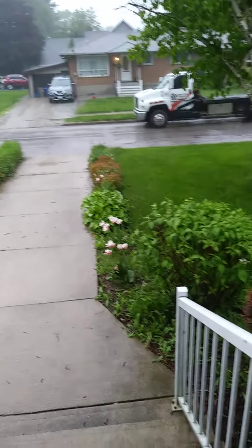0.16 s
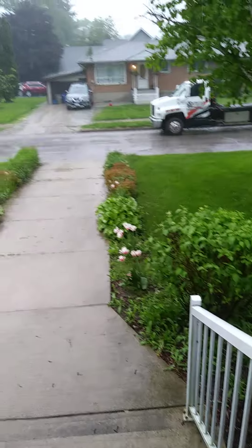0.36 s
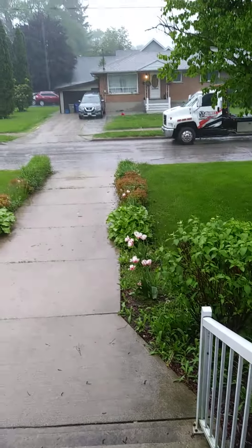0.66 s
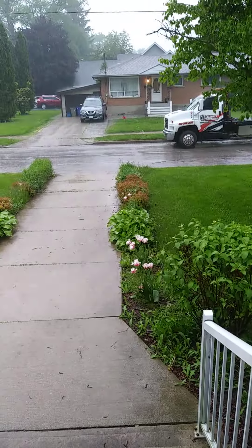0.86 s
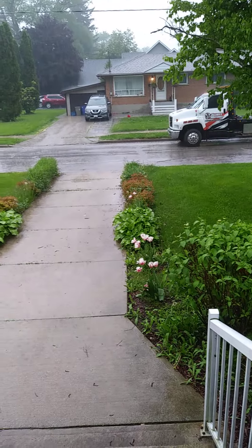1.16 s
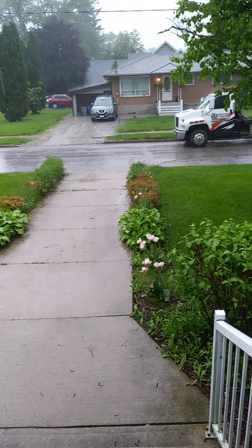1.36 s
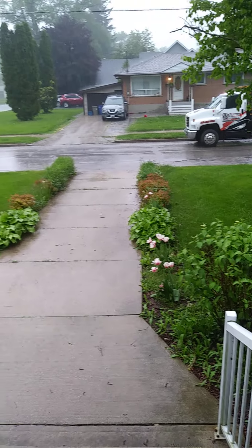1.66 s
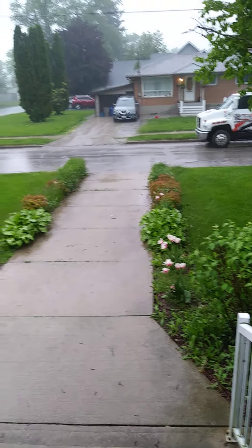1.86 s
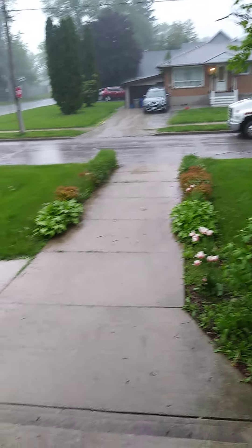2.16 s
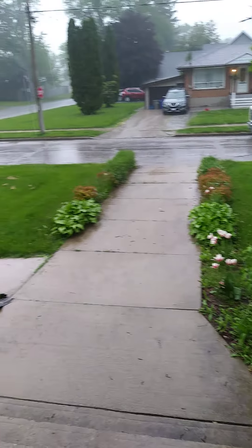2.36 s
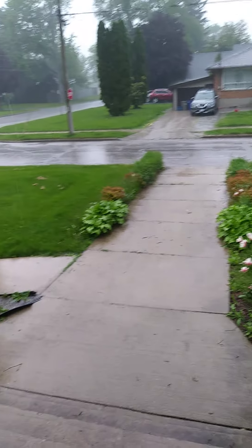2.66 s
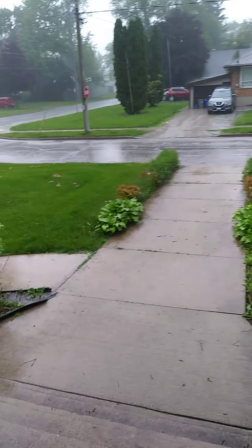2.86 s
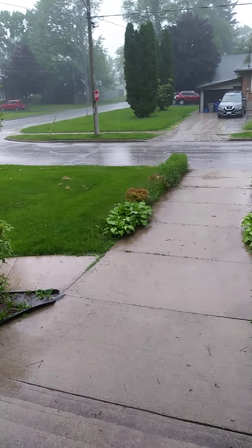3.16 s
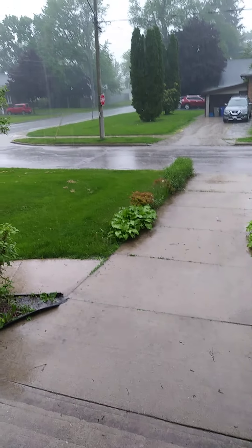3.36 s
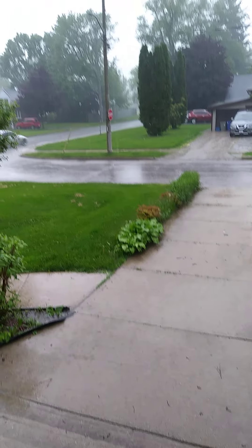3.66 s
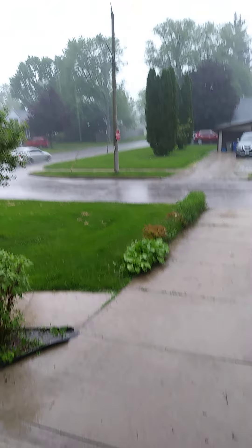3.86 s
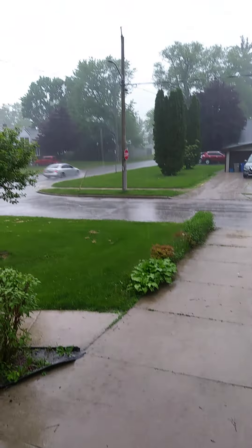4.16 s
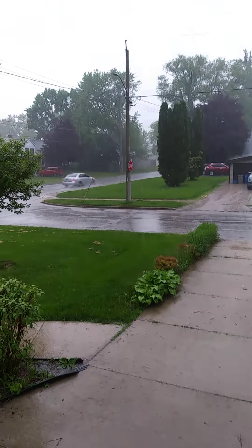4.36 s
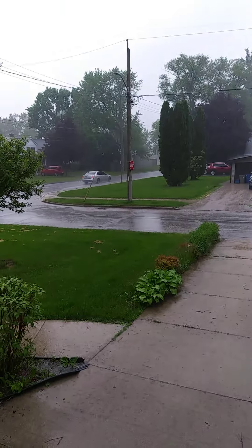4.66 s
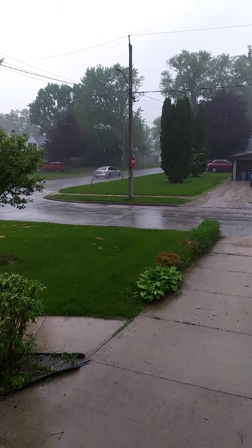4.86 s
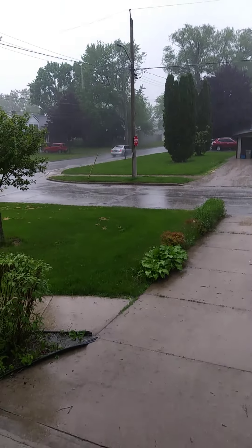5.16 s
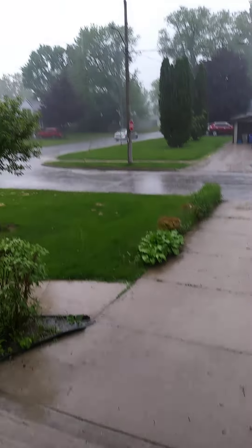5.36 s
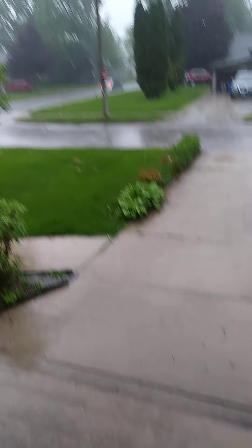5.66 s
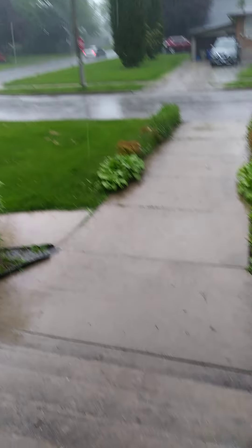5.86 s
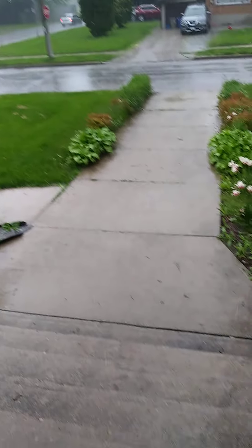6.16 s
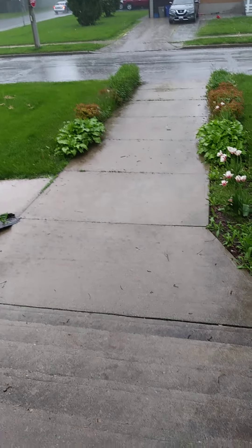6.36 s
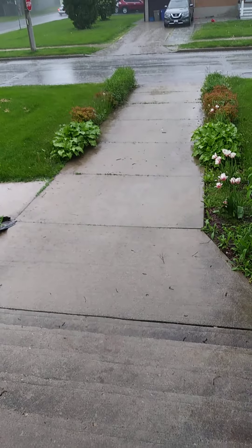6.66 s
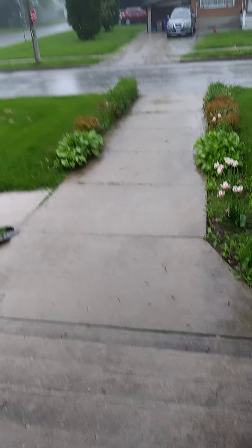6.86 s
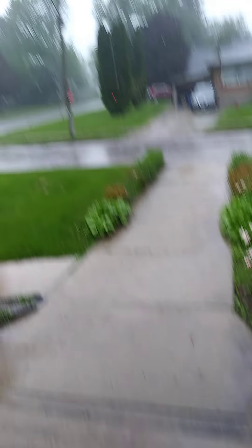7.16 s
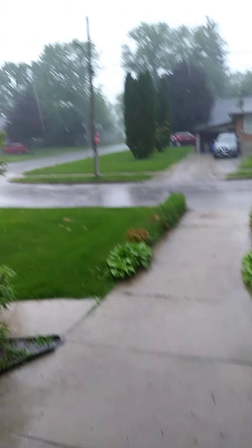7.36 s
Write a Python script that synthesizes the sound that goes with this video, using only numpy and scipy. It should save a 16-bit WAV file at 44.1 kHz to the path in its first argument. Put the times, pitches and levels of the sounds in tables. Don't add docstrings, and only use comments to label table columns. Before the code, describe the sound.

Heavy rain patters on pavement and a porch, close drops plinking and slapping, the hiss thinning watery; a low rumble surges in near the end.

```python
import sys
import numpy as np
from scipy import signal
from scipy.io import wavfile
from scipy.ndimage import uniform_filter1d

SR = 44100
rng = np.random.default_rng(int(sys.argv[2]) if len(sys.argv) > 2 else 0)


def natural_amplitude(level_db):
    exponent = np.asarray(level_db, float) / 20
    return 10 ** exponent


def waveform_to_disk(signal):
    frames = np.transpose(np.atleast_2d(signal))
    scaled = np.clip(frames, -1, 1) * 32767
    samples = np.round(scaled).astype(np.int16)
    wavfile.write(sys.argv[1], SR, samples)


N = 331632

# t/s, level/dB
RUMBLE_SURGES = [
    (5.945, -48.5),
    (6.07, -60.5),
    (6.152, -51),
    (6.269, -49.5),
    (6.549, -49),
    (6.728, -46.5),
    (7.078, -47),
    (7.25, -43),
    (7.37, -57),
]
# t/s, peak/dB, f/Hz
STEP_DRIPS = [(0.037, -14, 737), (0.152, -22.5, 750), (0.754, -20.5, 719), (1.466, -20.5, 905),
              (1.567, -15.5, 713), (1.937, -16, 729), (2.75, -38.5, 1063), (2.924, -33, 720),
              (3.132, -15, 1015), (3.592, -14, 1065), (3.816, -18, 714), (4.048, -19.5, 754),
              (4.311, -38, 920), (4.913, -31, 895), (5.632, -20.5, 960), (5.718, -20, 935),
              (6.112, -31, 1056), (6.14, -20.5, 640), (6.382, -27, 743)]
# t/s, peak/dB, f/Hz
PAVING_TICKS = [(0.0408, -13, 3430), (0.2858, -16.5, 3360), (0.352, -15, 3730), (0.843, -24, 3720),
                (1.0685, -17.5, 3410), (1.2334, -17, 4550), (1.372, -18.5, 3980), (1.464, -19.5, 3740),
                (1.5202, -14, 3580), (1.546, -15, 4060), (1.8356, -19.5, 3970), (2.0497, -11.5, 4670),
                (2.157, -15, 4600), (2.219, -16, 3830), (2.249, -24, 3570), (2.353, -18, 3300),
                (2.457, -24.5, 3320), (2.843, -16, 3700), (3.104, -23, 3360), (3.5728, -21.5, 3800),
                (3.8905, -22, 3280), (4.018, -26.5, 3600), (4.102, -23, 3600), (4.147, -14.5, 3350),
                (4.573, -19.5, 3540), (4.8429, -35.5, 3650), (5.3373, -21.5, 3340), (5.471, -18, 3700),
                (5.5474, -21.5, 3730), (5.654, -14, 3940), (6.026, -22, 4200), (6.2771, -18, 4550),
                (6.354, -27, 3780), (6.4217, -16.5, 4580), (6.6635, -12, 3330), (7.437, -20, 3640)]


def evened(x):
    return x / np.sqrt(np.mean(x ** 2) + 1e-20)


def read(points, hz):
    f, value = np.transpose(points)
    return np.interp(np.log(hz + 1), np.log(f + 1), value)


def column(rows, t, order):
    return np.interp(t, np.transpose(rows)[0], np.transpose(rows)[order])


def patches(shape, wide, long):
    field = uniform_filter1d(rng.standard_normal(shape), max(round(wide), 1), 0)
    return evened(uniform_filter1d(field, max(round(long), 1), 1))


def coloured(x, field_db, size=512):
    overlap = 3 * size // 4
    hz, t, z = signal.stft(x, SR, nperseg=size, noverlap=overlap, boundary="even")
    z = z * natural_amplitude(field_db(hz[:, None], t, z))
    return signal.istft(z, SR, nperseg=size, noverlap=overlap)[1][:N]


def bursts(events, rise_s, fall_db_per_s):
    t = np.arange(N) / SR
    total = np.zeros(N)
    for s, db in events:
        rise = np.clip((t - s) / rise_s, 0, 1)
        total += rise * natural_amplitude(db - fall_db_per_s * abs(t - s))
    return total


def plink(hz, cycles, glide):
    u = np.arange(round(5 * cycles * SR / hz) + 8) * hz / SR / cycles
    swell = 4.3 * u * np.exp(-1.6 * u)
    return swell * np.sin(2 * np.pi * cycles * u * (1 + glide * u))


def place(out, s, part):
    at = round(s * SR)
    out[at:at + len(part)] += part


def filtered(x, order, hz, kind):
    return signal.sosfilt(signal.butter(order, hz, kind, fs=SR, output="sos"), x)


def rumble():
    # f/Hz, level/dB
    rumble_colour = [(90, -68), (125, -42), (150, -18.5), (190, -3.5), (260, 3), (400, 1.5), (520, -8),
                     (800, -32.5)]

    def lumps_db(hz, t, z):
        return read(rumble_colour, hz[:, 0])[:, None] + 1.8 * patches(z.shape, 2, 14)
    noise = evened(coloured(rng.standard_normal(N), lumps_db))
    return noise * bursts(RUMBLE_SURGES, rise_s=.0055, fall_db_per_s=37.5)


def rain_db(t):
    # t/s, level/dB
    shower_levels = [(0, -20.5), (.06, -22), (.14, -25), (.9, -25.5), (1.2, -24), (2.4, -24), (3.2, -23),
                     (3.55, -21.5), (4.3, -22), (4.55, -24.5), (4.62, -24), (5.02, -24), (6.06, -25),
                     (6.15, -24.5), (6.45, -24.5), (6.68, -25.5), (6.95, -25.5), (7.52, -25.5)]
    # t/s, change of level/dB
    shower_heaves = [(.05, 0), (.24, 0), (.42, 2), (0.659, 2.5), (.82, -1), (1.05, 1.5), (1.22, 1),
                     (1.35, -0.5), (1.48, 2.5), (1.58, -0.5), (1.72, -0.5), (1.95, 4), (2.029, -2),
                     (2.19, 0.5), (2.32, 0), (2.4, 2), (2.56, -0.5), (2.611, -0.5), (2.68, 0.5), (2.85, 0),
                     (3.151, 2.5), (3.23, -1), (3.48, 1), (3.62, 1), (3.841, 1.5), (4.03, -1), (4.14, -1.5),
                     (4.42, -2), (4.53, -3.5), (4.6, 3.5), (4.72, -2), (4.95, 1.5), (5.17, 1), (5.3, 0),
                     (5.43, 2), (5.49, 2.5), (5.61, 1.5), (5.75, 0.5), (5.93, -1.5), (6.09, -2.5),
                     (6.15, 2), (6.33, -3), (6.44, -6.5), (6.53, -0.5), (6.67, 2.5), (6.75, -3.5),
                     (6.839, 3.5), (6.97, -3.5), (7.12, -0.5), (7.231, -1.5), (7.32, 1.5), (7.39, -0.5),
                     (7.49, 1)]
    heave_s = .025
    s, db = np.transpose(shower_heaves)
    coarse = np.arange(0, N / SR, .004)
    heaves_db = np.exp(-((coarse[:, None] - s) / heave_s) ** 2) @ db
    return column(shower_levels, t, order=1) + np.interp(t, coarse, heaves_db)


def patter(per_s, spread_db, cycles, count=24):
    drop_size = natural_amplitude(spread_db * np.minimum(rng.exponential(1, N), 3.8))
    drop_size = drop_size * (rng.random(N) < per_s / SR)
    kind = rng.integers(0, count, N)
    out = np.zeros(N)
    for k, hz in enumerate(np.geomspace(300, 15000, count)):
        drop = evened(plink(hz, cycles, .042)) * hz / 1000
        out += signal.oaconvolve(drop_size * (kind == k), drop)[:N]
    return evened(signal.lfilter([1], [1, -.6], out))


def rain():
    # f/Hz, density/dB per Hz
    wash_colour = [(71, -72), (120, -62), (213, -39), (723, -8), (982, -9), (1200, -5), (1780, -3.5),
                   (2270, -3.5), (2840, -7.5), (3140, -7), (3480, -11.5), (5130, -14.5), (6290, -28),
                   (12100, -43), (15800, -47.5)]
    swell_db, swell_low_hz, swell_high_hz = .3, 900, 5200
    bright_db, brighter_db_per_s = -4, .4654

    def field_db(hz, t, z):
        flat_db = -10 * np.log10(uniform_filter1d(np.mean(abs(z) ** 2, 1, keepdims=True), 5, 0))
        gusts_db = 1.48 * patches(z.shape, 2, 25) + patches(z.shape, 90, 3)
        body = (hz > swell_low_hz) * (hz < swell_high_hz)
        heaving_db = swell_db * patches(z.shape, 70, 40) * (.18 + body)
        upper_body = 1 / (1 + (3100 / (hz + 1)) ** 8 + (hz / 5800) ** 8)
        upper_db = (bright_db + brighter_db_per_s * t) * upper_body
        return flat_db + read(wash_colour, hz[:, 0])[:, None] + gusts_db + heaving_db + upper_db
    drops = rng.standard_normal(N) + .46 * patter(2200, spread_db=2.3, cycles=1.6)
    return natural_amplitude(rain_db(np.arange(N) / SR) + 2) * evened(coloured(drops, field_db))


def spatters():
    # t/s, peak/dB
    spray_bursts = [(0.0407, -16.5), (0.287, -21.5), (0.353, -15.5), (0.843, -19), (1.376, -14),
                    (1.465, -14), (2.0505, -15.5), (2.251, -14.5), (3.108, -16.5), (3.8886, -16),
                    (4.022, -25), (4.1482, -12.5), (5.037, -32.5), (5.542, -18.5), (6.0243, -25.5),
                    (6.666, -11)]
    t60_s = .08
    spray = evened(filtered(rng.standard_normal(N), 4, (2300, 4900), "band"))
    return natural_amplitude(-10) * spray * bursts(spray_bursts, rise_s=.002, fall_db_per_s=60 / t60_s)


def ticks():
    out = np.zeros(N + SR)
    for s, db, hz in PAVING_TICKS:
        place(out, s, natural_amplitude(db - 1) * plink(hz, cycles=3.2, glide=.0061))
    return out[:N]


def thuds():
    out = np.zeros(N + SR)
    for s, db, hz in STEP_DRIPS:
        place(out, s, natural_amplitude(db - 7) * plink(hz, cycles=8, glide=.0011))
    return filtered(out[:N], 3, 350, "high")


def slaps():
    concrete_slaps = [(0.0178, -10, 1710), (0.0374, -12.5, 1490), (0.2312, -12.5, 1640), (0.451, -13, 2000),
                      (0.5374, -20.5, 1830), (0.6311, -18, 1670), (0.8428, -13, 2620), (1.053, -16, 1645),
                      (1.3748, -22.5, 2520), (1.395, -13.0, 2380), (1.4731, -11, 1760),
                      (1.551, -12.5, 2140), (1.58, -15.0, 2070), (1.94, -16, 1730), (1.97, -17, 2350),
                      (2.0523, -21.5, 3400), (2.1847, -12.0, 2220), (2.4766, -13.0, 2000),
                      (2.5212, -15, 2160), (2.6023, -5.5, 2390), (2.7389, -16.5, 2080), (2.8245, -18, 2510),
                      (2.9456, -16.5, 2200), (2.958, -10, 1810), (3.1063, -16, 2450), (3.1467, -12, 1730),
                      (3.2704, -15, 2410), (3.41, -6.5, 2170), (3.7451, -14.5, 2360), (3.9743, -12.5, 1860),
                      (4.0304, -11, 2270), (4.0957, -11.5, 2030), (4.1218, -8.5, 2160),
                      (4.1519, -7.5, 2780), (4.303, -10.5, 2150), (4.3488, -12.0, 1790),
                      (4.6017, -10.5, 2300), (4.7966, -8.5, 2150), (5.0382, -5, 2620), (5.469, -9, 2430),
                      (5.5116, -16, 2150), (5.5479, -13.5, 2400), (5.656, -12.5, 2370), (5.726, -9.5, 2550),
                      (5.866, -13.5, 2380), (7.06, -10.5, 2370)]
    cycles = 1.6
    out = np.zeros(N + SR)
    for s, db, hz in concrete_slaps:
        peak_lag_s = cycles / hz / 1.6
        place(out, s - peak_lag_s, natural_amplitude(db) * plink(hz, cycles, glide=.015))
    return filtered(out[:N], 3, (600, 5500), "band")


def near_drops():
    # t/s, peak/dB, f/Hz
    porch_drops = [(0.0363, -19, 1640), (0.3526, -20.5, 2200), (0.3721, -13.5, 1690), (0.5716, -18, 1434),
                   (0.841, -14.5, 2730), (1.0236, -13, 1495), (1.2216, -10, 1720), (1.4681, -11.5, 2190),
                   (1.9385, -11.5, 1530), (2.1006, -15, 1890), (2.1834, -15, 2140), (2.2144, -12.5, 1935),
                   (2.2493, -8.5, 2700), (2.393, -12, 1880), (2.601, -15, 2006), (2.7367, -10.5, 2120),
                   (2.823, -9.5, 2260), (2.8444, -11, 2170), (2.9412, -13.5, 2020), (3.0265, -12.5, 2190),
                   (3.0704, -12.5, 2490), (3.2385, -14.5, 1330), (3.3029, -15, 2460), (3.3747, -9, 2170),
                   (3.4516, -9, 2090), (3.4755, -8, 2270), (3.4979, -13, 1920), (3.5344, -9, 2035),
                   (3.5813, -10, 2270), (3.6671, -12, 1534), (3.7379, -9.5, 2000), (3.8916, -12.5, 2260),
                   (3.9729, -19.5, 1940), (4.0921, -21, 2050), (4.1195, -14, 2250), (4.1505, -13.5, 1880),
                   (4.4209, -11.5, 1525), (4.5965, -9, 2250), (4.6224, -12.5, 1930), (4.6433, -10, 2110),
                   (4.7955, -8.5, 1960), (4.9048, -10, 2730), (4.9377, -11.5, 1800), (5.0384, -13, 1940),
                   (5.466, -10.5, 1970), (5.5084, -9.5, 1840), (5.6436, -12, 2160), (5.9224, -12.5, 2270),
                   (5.9673, -14, 2190), (6.2183, -6.5, 1650), (6.3574, -9.5, 2380), (6.556, -13, 1786),
                   (6.8299, -14.5, 2160), (6.9107, -11, 2190), (7.0349, -11.5, 2000), (7.1526, -7, 2030),
                   (7.2689, -10, 2080), (7.3452, -7, 1990), (7.4046, -9, 2000), (7.4764, -10.5, 2000)]
    body_db = 2.2
    splash_db, splash_db_per_octave = -14, 6
    out = np.zeros(N + SR)
    for (s, db, hz), luck in zip(porch_drops, rng.random((len(porch_drops), 2))):
        body = natural_amplitude(1.25 * db + body_db) * plink(hz, 1.7 + 1.2 * luck[0], .02)
        splash_level_db = db + splash_db + splash_db_per_octave * np.log2(hz / 2000)
        splash = natural_amplitude(splash_level_db) * plink(hz * 1.5, 3.5, .013)
        place(out, s + .0004, body)
        place(out, s + .0004, splash)
        place(out, s + .003 + .003 * luck[1], .4 * body)
        place(out, s - .003 - .002 * luck[0], .25 * body)
    return filtered(out[:N], 3, 700, "high")


def scene():
    return (rain() + near_drops() + slaps() + ticks() + thuds() + rumble() + spatters())[None]


def learnt_margin_db(centre, t, shape):
    # f/Hz, t when learnt/s
    learnt_times = [(150, 4.6), (500, 2.3), (1000, 2), (1200, 10.4), (1400, 0.34), (1700, 20.6),
                    (2900, 13.1), (3200, 5.6), (3500, 10.4), (4200, 11.4), (5100, 4.25),
                    (5400, 0.5), (6000, 3), (6600, 3.5), (6950, 6.5), (7400, 2.5), (8100, 1.94), (8900, 4),
                     (9500, 0.4), (10800, .6), (11600, .4), (14000, .5), (15100, 0.5), (15900, 5)]
    tick_opens_db, tick_opens_s = 2, .012
    treble = centre > 5300
    speed_db_per_s = 1.28 + treble + 2.4 * (centre > 7200) - 2 * (centre > 11200)
    margin_db = speed_db_per_s * (t - read(learnt_times, centre[:, 0])[:, None])
    margin_db = margin_db + 3 * patches(shape, 1, 160) * np.where(treble, .4, .5)
    margin_db = margin_db + .9 * patches(shape, 60, 9) * treble
    flicks = sum(np.exp(-((t - s - tick_opens_s) / tick_opens_s) ** 2) for s, db, hz in PAVING_TICKS)
    return margin_db - treble * tick_opens_db * flicks


def lows_edge_db(centre, t, lows_top_hz):
    # t/s, edge/octaves above 100 Hz
    noise_edge = [(0, 1.1), (1, 1.38), (1.55, 1.34), (2.2, 1.77), (2.7, 2.7), (2.85, 2.59), (3.4, 2.76),
                  (3.8, 1.15), (4.25, 2.71), (4.7, 3.3), (5.05, 2.88), (5.35, 5.1), (5.6, 3.95),
                  (5.8, 2.65), (6.05, 3.47), (6.25, 2.26), (7.05, 2.58), (7.52, 2.64)]
    edge_db_per_octave = 8.5
    drip_opens_db, drip_opens_s = 1.5, .03
    rumble_opens_db, rumble_top_hz = 9.5, 480
    edge_db = edge_db_per_octave * (column(noise_edge, t, order=1) - np.log2(centre / 100 + .037))
    drips = sum(np.exp(-((t - s - .02) / drip_opens_s) ** 2) for s, db, hz in STEP_DRIPS)
    top_hz = np.where(t > RUMBLE_SURGES[2][0], rumble_top_hz, rumble_top_hz / 2)
    rumbling = (t > RUMBLE_SURGES[0][0]) * (centre < top_hz)
    return edge_db - drip_opens_db * drips - rumble_opens_db * rumbling


def spells_db(centre, t):
    # start/s, length/s, f/Hz, margin/dB
    low_and_body_spells = [(.15, .9, 3200, 12), (.59, .39, 1400, 4), (1.3, .65, 3200, 7.5), (2.05, .35, 1550, -4),
                           (2.08, .1, 600, -5), (2.56, .14, 1400, 10), (2.62, .14, 800, -5), (3.05, .23, 750, -8),
                           (3.3, .17, 800, -6), (4.38, .36, 1100, -5), (4.4, .15, 1500, -3), (4.62, .08, 580, 6),
                           (4.78, .1, 1500, -4), (5.07, .06, 1100, -5), (5.22, .18, 1000, 4), (5.45, .08, 1300, -5),
                           (5.83, .1, 900, -5), (5.86, .28, 1400, 12), (6.02, .09, 450, -6), (6.11, .1, 560, -16),
                           (6.11, .1, 900, -10), (6.16, .49, 3200, 8), (6.21, .08, 560, -6), (6.28, .1, 700, 6),
                           (6.34, .25, 1500, 7), (6.45, .08, 560, -6), (6.5, .22, 1150, -5), (6.7, .1, 560, -7),
                           (6.75, .25, 1350, 8), (6.9, .15, 1100, 6), (6.98, .18, 760, 5), (7.17, .11, 950, 7),
                           (7.08, .12, 1150, 5), (7.15, .37, 3200, 2), (7.18, .1, 1300, -5), (7.42, .09, 1100, 6),
                           (7.28, .1, 920, -8), (7.39, .1, 800, 7), (7.44, .08, 560, -8), (7.49, .03, 800, -10),
                           (.08, .1, 300, 5), (.22, .1, 400, 6), (.44, .08, 400, -6), (.74, .08, 350, 4),
                  (.86, .19, 450, 5), (1.06, .1, 420, -6), (1.26, .08, 300, -6), (1.42, .08, 400, -6),
                  (1.45, .18, 520, -8), (1.8, .1, 450, 5), (2.06, .06, 375, -5), (2.19, .12, 420, -8),
                  (2.77, .08, 450, -8), (2.95, .07, 480, -7), (3.05, .05, 375, -7), (3.14, .12, 480, -7),
                  (3.5, .06, 430, -8), (3.67, .06, 400, -8), (3.83, .14, 330, -8), (3.97, .07, 560, 8),
                  (4.04, .09, 420, -8), (4.3, .05, 375, -7), (4.35, .2, 800, -9), (4.36, .04, 230, -10),
                  (4.47, .1, 600, -4), (4.62, .1, 750, 3), (4.74, .12, 560, -7), (4.8, .1, 1000, 7),
                  (4.89, .13, 800, -5), (5.06, .05, 300, -9), (5.21, .06, 450, -7), (5.38, .16, 780, -12),
                  (5.57, .13, 700, 8), (5.62, .06, 375, -9), (5.72, .1, 620, -9), (5.83, .05, 450, -7),
                  (5.94, .07, 400, -16), (5.95, .06, 750, -6), (6.2, .07, 750, -4), (6.31, .07, 950, 7),
                  (6.38, .06, 700, -10), (6.43, .07, 950, 8), (6.5, .1, 700, 4), (6.6, .06, 580, 6),
                  (6.75, .2, 780, 4), (6.75, .3, 1020, 6), (7, .09, 500, 6), (7.09, .06, 520, -10),
                  (7.1, .14, 720, 6), (7.36, .12, 720, 6)]
    # start/s, length/s, f/Hz, margin/dB
    treble_spells = [(0, 2.4, 5500, -6), (0, 1.75, 9900, -5), (0, 1.35, 10500, -3), (0, .9, 11800, -2),
                     (1.4, .5, 10700, -3), (2.5, .5, 5300, -4), (0, 1.85, 15200, -4), (.9, 1.1, 11800, -2),
                     (.9, 1.1, 12900, -2), (1.15, .4, 14200, 6), (1.85, .6, 7900, 4), (1.85, .6, 10200, 5),
                     (2.4, 1.5, 5650, -4), (3.2, .8, 8300, 3), (3.5, .8, 6150, 2), (4.1, 1.9, 6000, -2.5),
                     (4.55, 1.5, 5300, -3), (4.6, 1.1, 8900, -2.5), (5.05, .35, 6200, 2),
                     (5.6, .4, 6100, -2), (6, 1.52, 5800, 5), (6.05, .2, 6800, 3), (5.75, 1.77, 8700, 3),
                     (6.6, .92, 5050, -4), (6.8, .72, 6800, -2), (7.47, .05, 15200, -15)]
    total_db = np.zeros((len(centre), len(t)))
    for spells, half_width_hz, blur_s in ((low_and_body_spells, 150, .01), (treble_spells, 560, .07)):
        for s, length, band_hz, db in spells:
            inside_s = np.minimum(t - s + (s == 0), s + length - t)
            held = np.clip(inside_s / min(blur_s, length / 2) + .5, 0, 1)
            total_db += db * (abs(centre - band_hz) < half_width_hz) * held
    return total_db


def suppressor_db(hz, t, z):
    # f/Hz, gain/dB
    shut_gain = [(150, -17), (350, -18), (600, -26), (1000, -12.5), (1500, -12), (4000, -17.5), (6000, -23),
                 (9000, -24.5), (12000, -28.5), (15500, -22.5)]
    # f/Hz, width/Hz, gain/dB
    band_seams = [(3130, 36, -15), (6070, 45, -14), (7058, 101, -24), (9060, 50, -5), (9520, 70, -10.5)]
    # f/Hz, width/Hz, drop of margin ceiling/dB
    leaky_bands = [(6750, 200, 10), (8770, 420, 7.5), (15050, 130, 3.5), (15530, 130, 9.5),
                   (6070, 390, -11)]
    band_hz, hop, memory_s, lows_top_hz = 187.5, 128, .032, 1016
    band = np.round(hz[:, 0] / band_hz).astype(int)
    centre = np.arange(band[-1] + 1)[:, None] * band_hz

    power = np.add.reduceat(abs(z) ** 2, np.searchsorted(band, np.arange(len(centre))), axis=0)
    keep = np.exp(-hop / SR / memory_s)
    start = keep * np.median(power, 1, keepdims=True)
    power = signal.lfilter([1 - keep], [1, -keep], power, zi=start)[0]
    power_db = 10 * np.log10(power + 1e-16) - .9 * rain_db(t - .015)
    excess_db = power_db - np.median(power_db, 1, keepdims=True)

    margin_db = learnt_margin_db(centre, t, power.shape)
    edge_db = lows_edge_db(centre, t, lows_top_hz)
    margin_db = margin_db + (edge_db - margin_db) / (1 + (centre / lows_top_hz) ** 8)
    margin_db = margin_db + spells_db(centre, t)
    margin_db = margin_db + .93 * patches(power.shape, 2, 24) * (centre < 4300)
    margin_db = margin_db + 1.7 * patches(power.shape, 1, 20) * (centre > 5300)
    ceiling_db = 8.5 - sum(db * np.exp(-((centre - f) / width) ** 2) for f, width, db in leaky_bands)

    softness_db = 1.2 + .25 * (centre > 7200)
    over_db = excess_db - np.minimum(margin_db, ceiling_db)
    shut = 1 / (1 + np.exp(np.clip(over_db / softness_db, -30, 30)))
    gain_db = read(shut_gain, centre[:, 0])[:, None] * shut
    gain_db = uniform_filter1d(gain_db[band], size=2, axis=0)
    seams_db = sum(db / (1 + ((hz - f) / width) ** 4) for f, width, db in band_seams)
    wind_filter_db = -10 * np.log10(1 + (150 / (hz + 1)) ** 12)
    return gain_db + seams_db + wind_filter_db


def subtraction_db(hz, t, z):
    power = uniform_filter1d(abs(z) ** 2, size=2, axis=1) + 1e-18
    around = uniform_filter1d(uniform_filter1d(power, size=15, axis=0), size=5, axis=1)
    return 10 * np.log10(np.maximum(1 - .23 * around / power, .25))


def roll_off(x):
    return signal.sosfilt(signal.butter(12, 15740, fs=SR, output="sos"), x)


def record(dry):
    # t/s, level/dB
    overload_snap = (4.1518, -29)
    x = coloured(dry[0], suppressor_db)
    x = natural_amplitude(-0.5) * coloured(x, subtraction_db, size=2048)
    x = x + natural_amplitude(-76.5) * rng.standard_normal(N)
    x[round(overload_snap[0] * SR)] += natural_amplitude(overload_snap[1] - 1)
    return roll_off(x[None])


dry = scene()
out = record(dry)
waveform_to_disk(out)
```